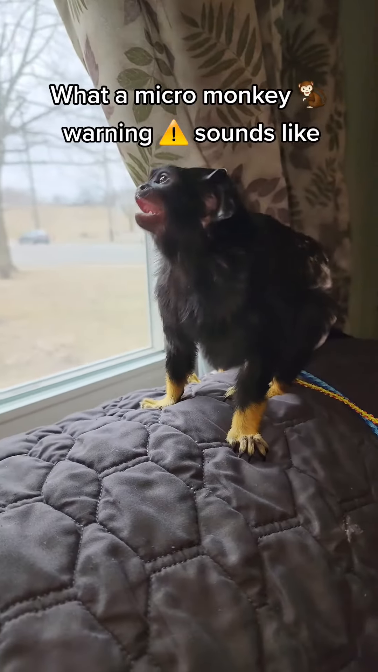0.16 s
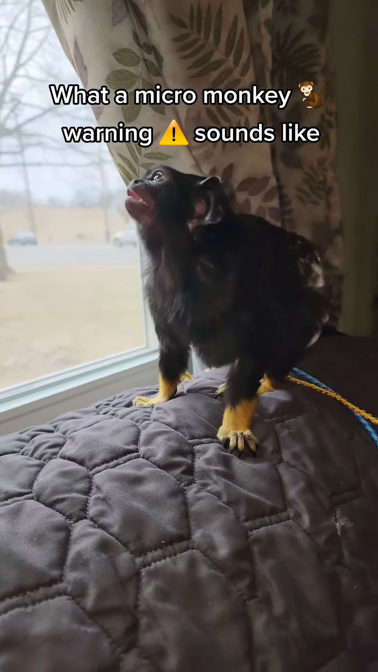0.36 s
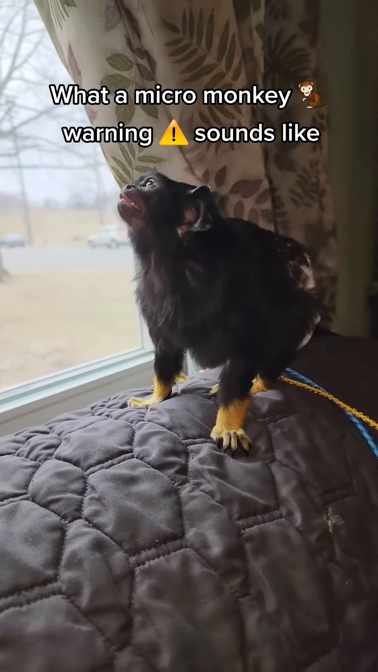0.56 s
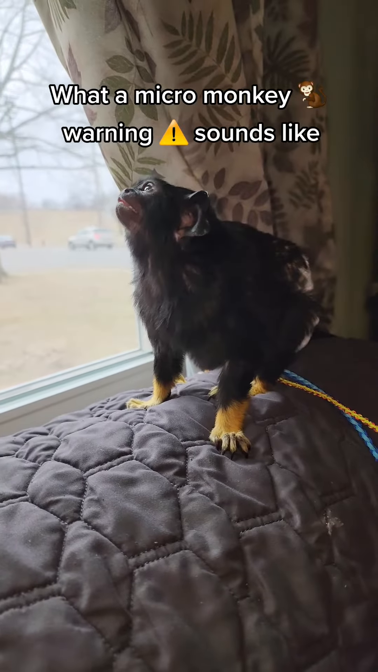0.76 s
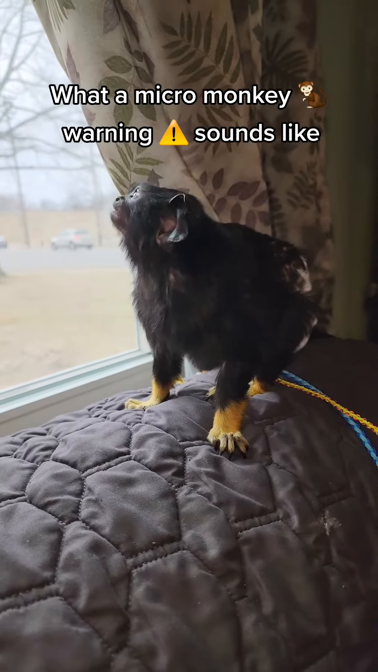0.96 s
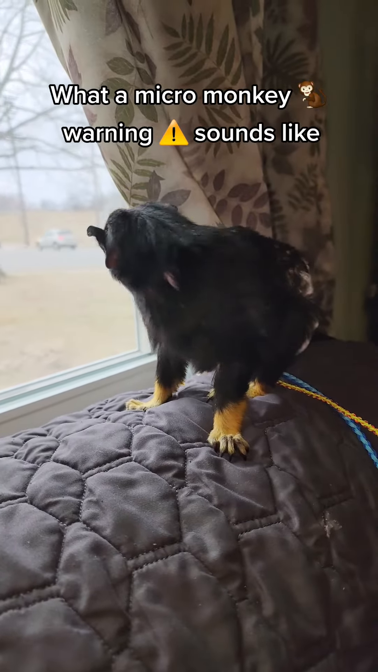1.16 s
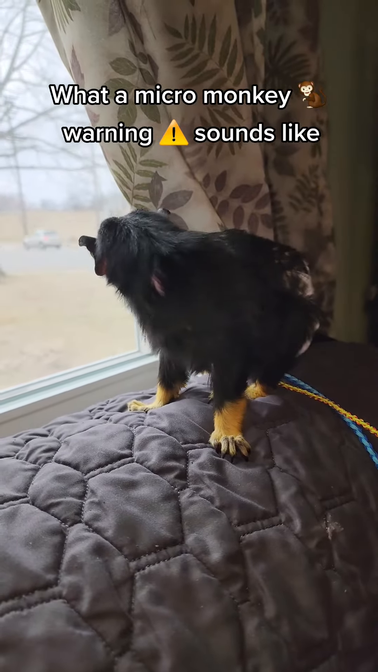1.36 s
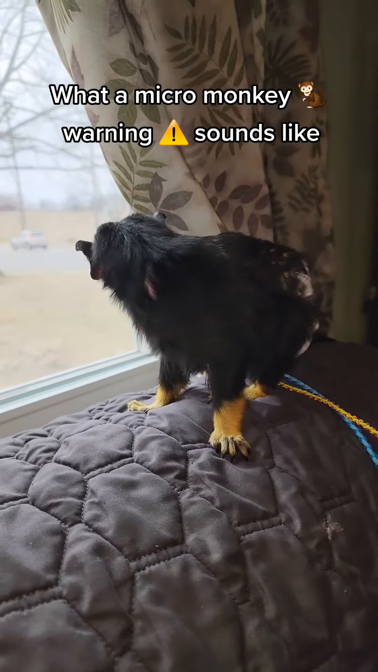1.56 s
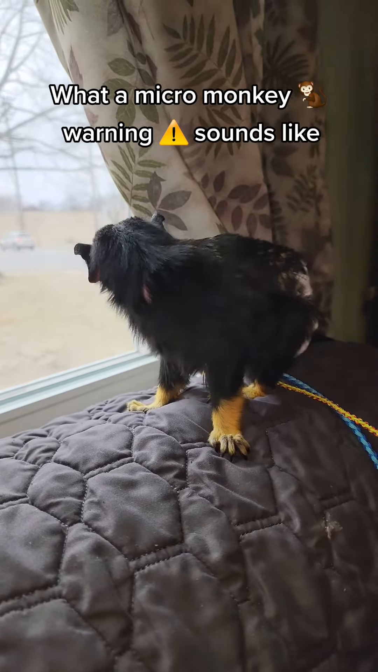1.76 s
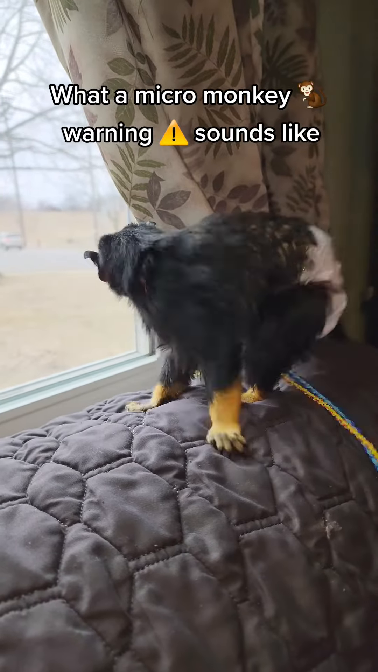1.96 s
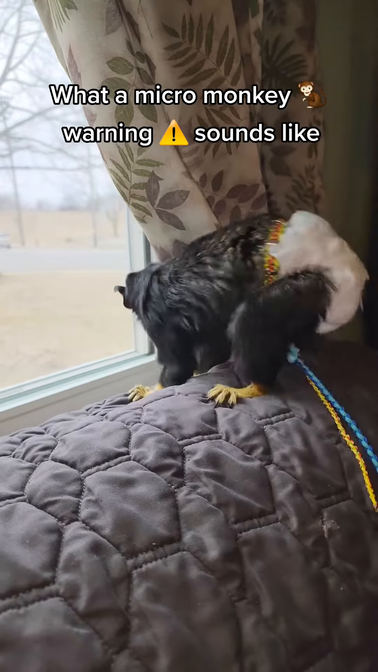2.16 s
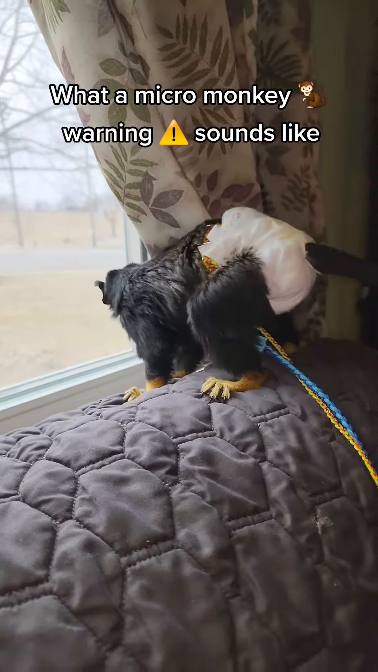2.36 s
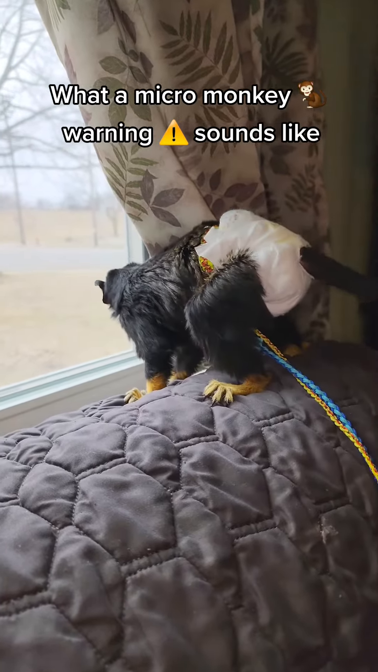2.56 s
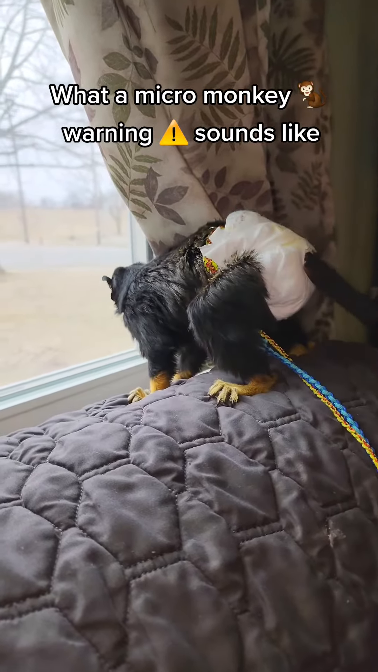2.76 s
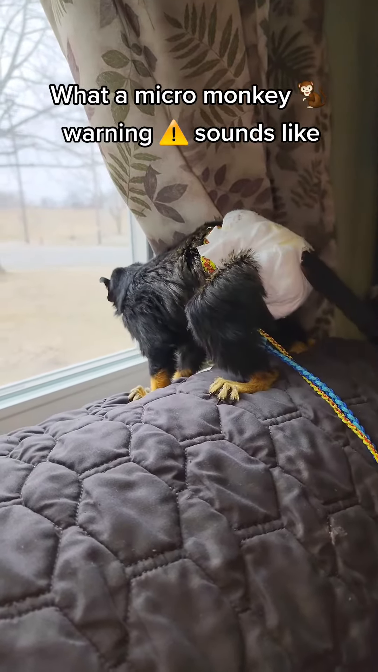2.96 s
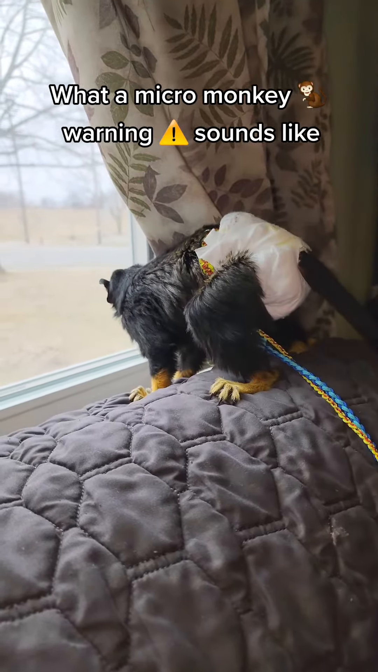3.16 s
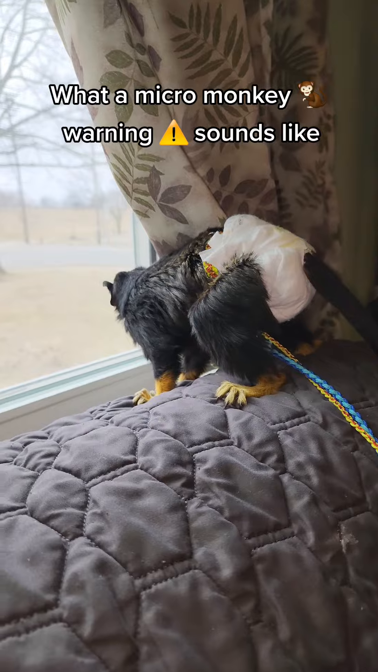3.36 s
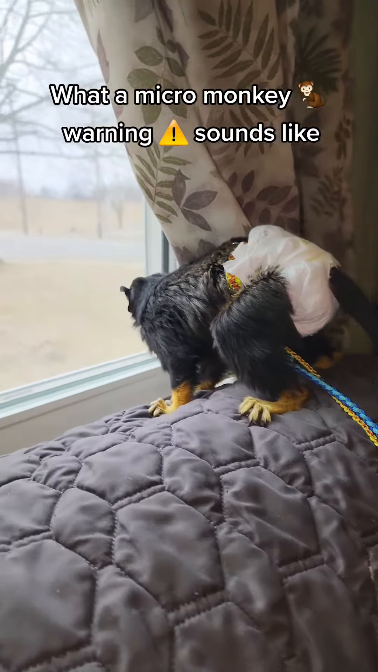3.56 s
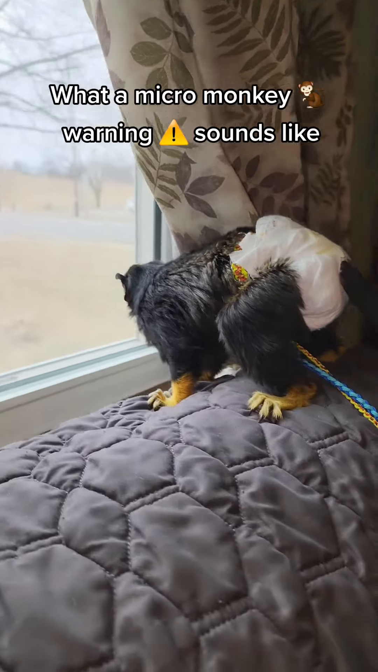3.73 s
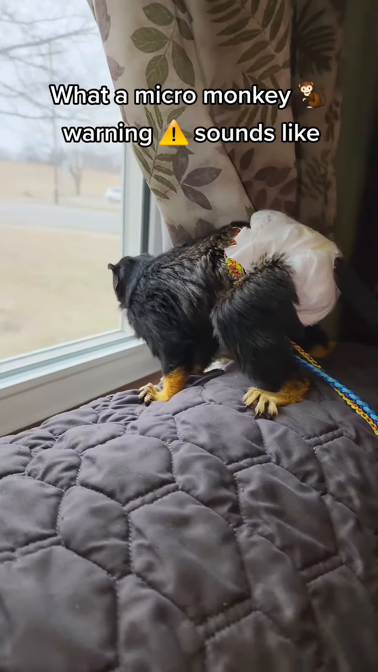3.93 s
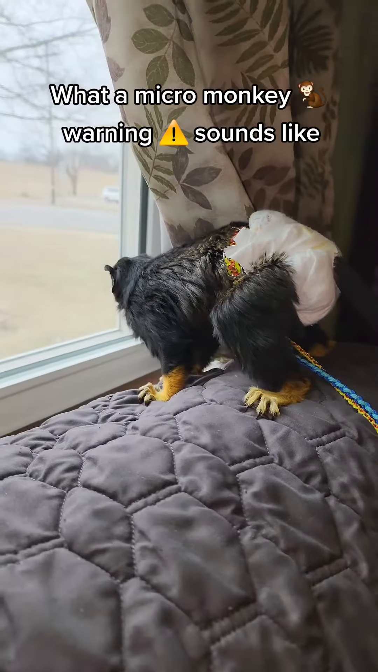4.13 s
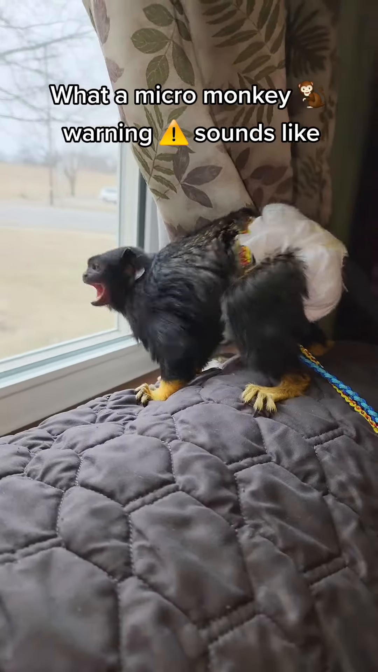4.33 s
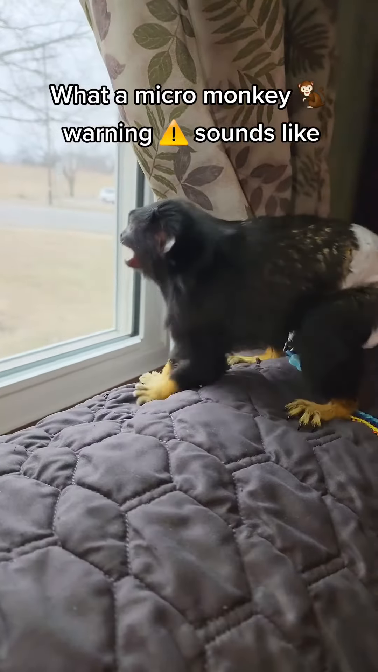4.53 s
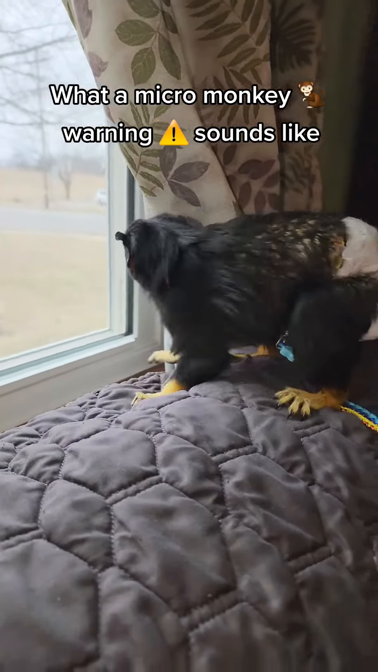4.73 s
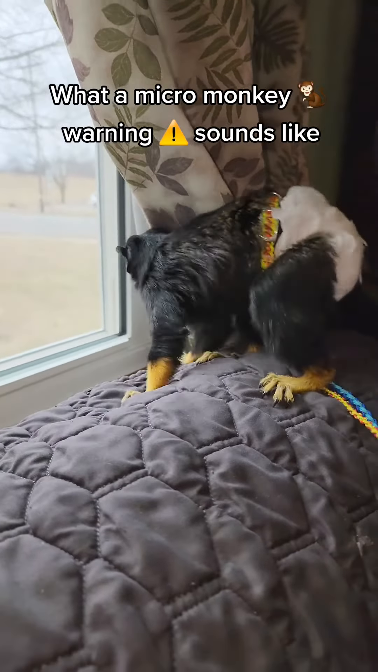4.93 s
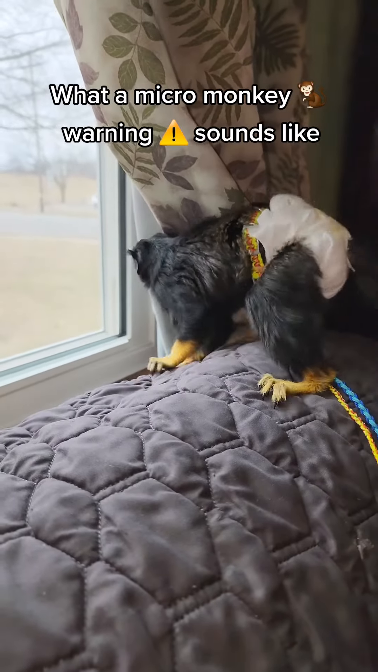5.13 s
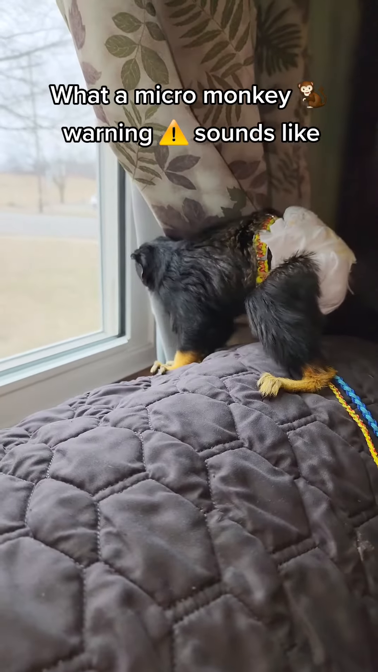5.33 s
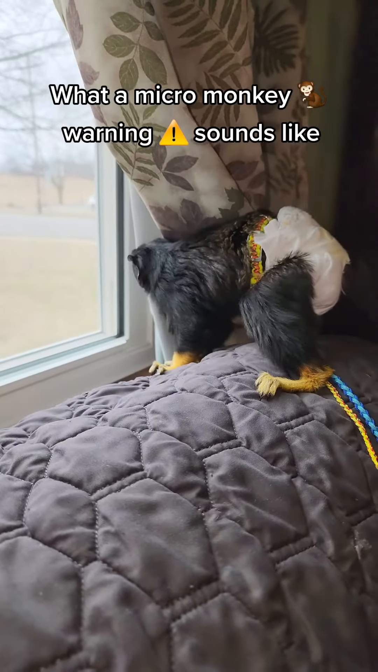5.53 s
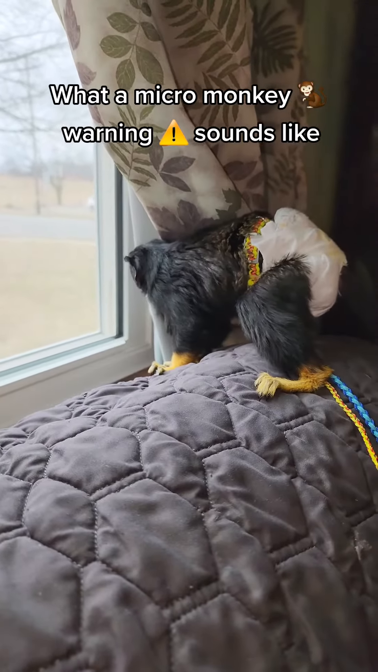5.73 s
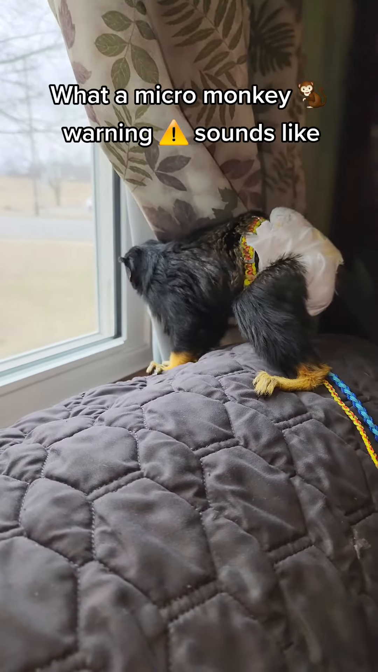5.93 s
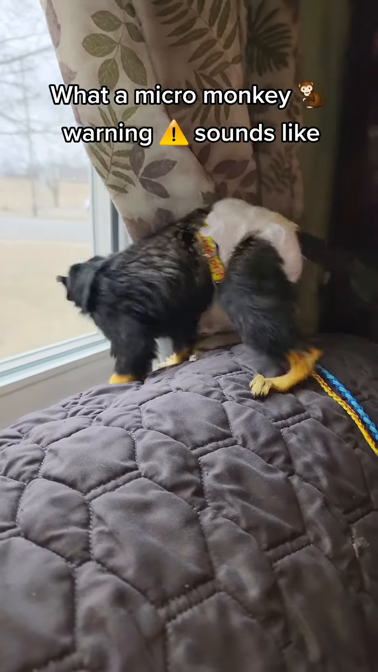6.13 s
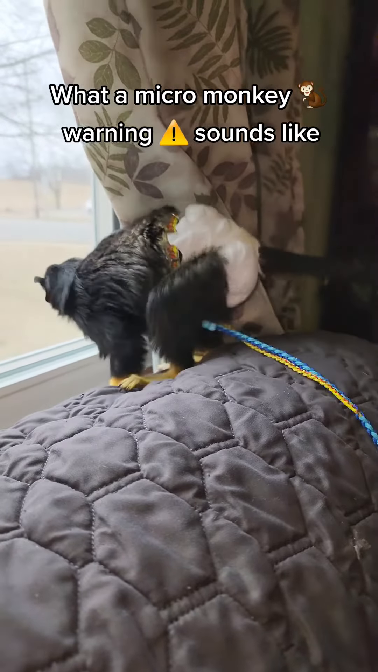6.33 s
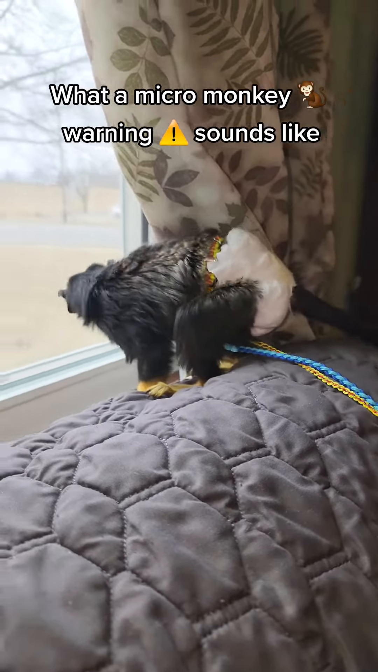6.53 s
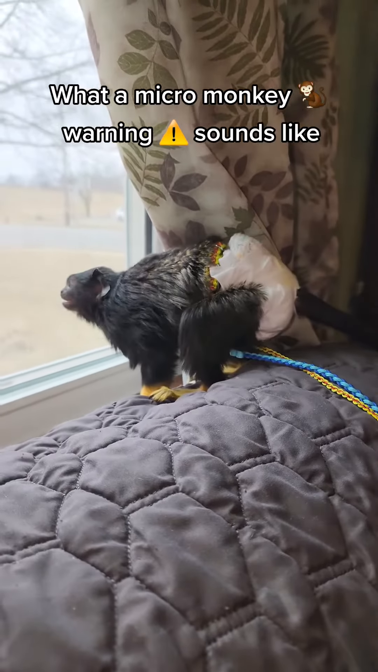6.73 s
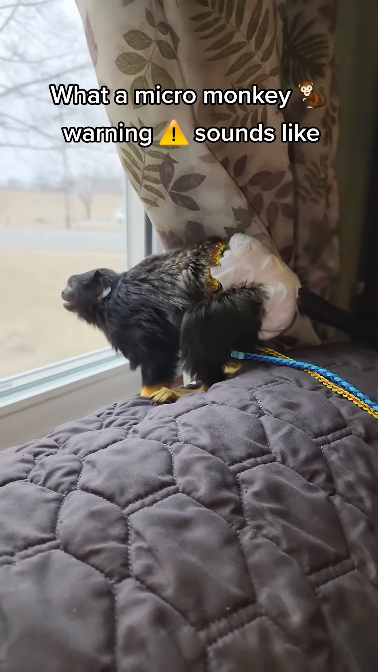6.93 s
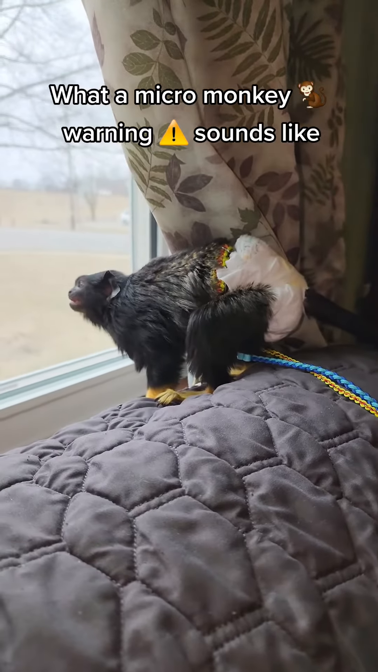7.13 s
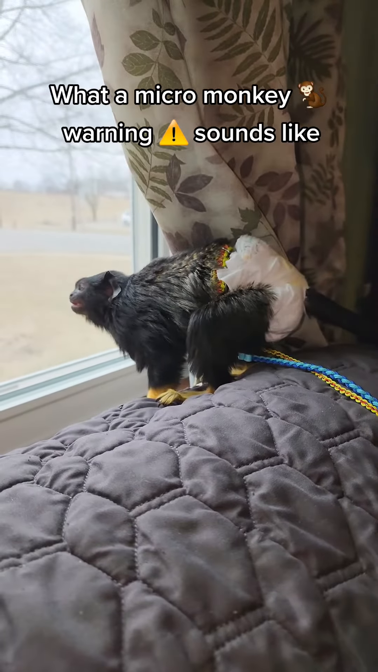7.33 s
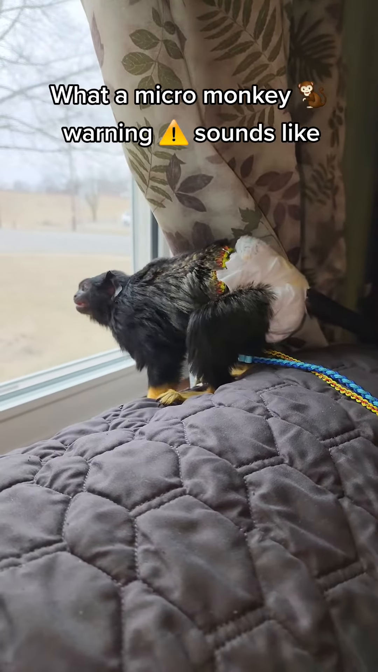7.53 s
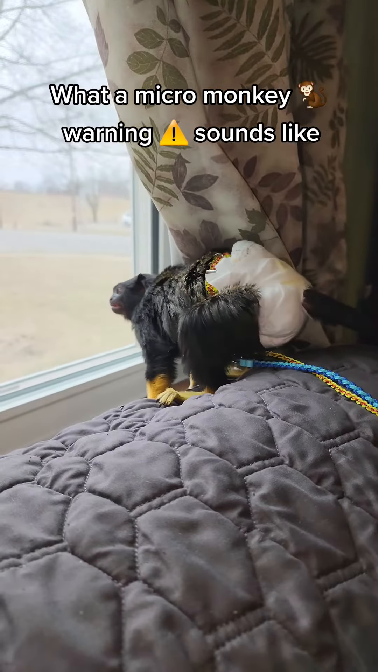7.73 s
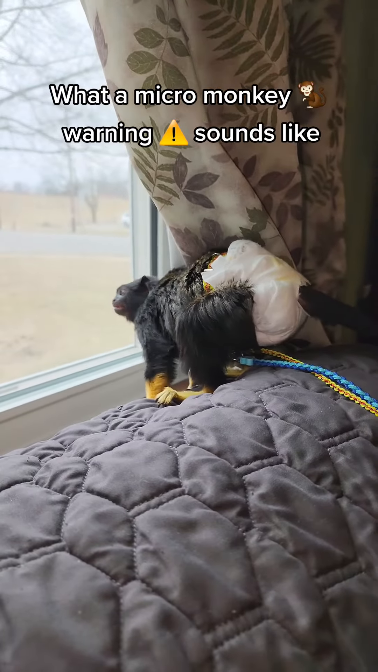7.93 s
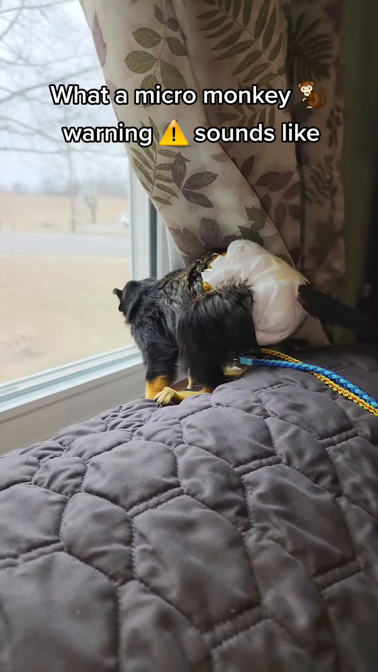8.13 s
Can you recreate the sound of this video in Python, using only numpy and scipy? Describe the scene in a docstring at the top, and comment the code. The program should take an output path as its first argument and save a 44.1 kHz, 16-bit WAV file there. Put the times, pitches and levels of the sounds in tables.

```python
"""On a quilted sofa back by a window, a tamarin gives four bursts of shrill, very short alarm chirps.
Each chirp is a gliding note with partials weighted by the fixed resonances of the mouth.
Between bursts come soft peeps and a thin whistle, also sine tones; shaped noise makes the rustling quilt.
Damped sines make a few dull knocks nearby; a far clock ticks in blurred noise.
The small room rings briefly and hums low; two closely spaced microphones listen."""
import sys
import numpy as np
from scipy import signal
from scipy.fft import rfft, irfft, next_fast_len
from scipy.io import wavfile
from scipy.ndimage import uniform_filter1d, map_coordinates

SR = 44100
rng = np.random.default_rng(int(sys.argv[2]) if len(sys.argv) > 2 else 0)


def master_out(mix):
    """Clip the mix to full scale and print it as 16-bit PCM to the path in sys.argv[1]."""
    frames = np.transpose(np.atleast_2d(mix))
    ceiling = np.clip(frames, -1, 1)
    pcm = np.round(ceiling * 32767).astype(np.int16)
    wavfile.write(sys.argv[1], SR, pcm)


N = 360946  # length in samples
TOP_HZ = 15850  # upper band limit of the notes and the recorder


def amp(db):
    """Decibels to an amplitude factor."""
    return 10 ** (np.asarray(db) / 20)


def unit(x):
    """Scale a signal to rms 1."""
    return x / np.sqrt(np.mean(x ** 2) + 1e-20)


def along(points, hz):
    """Read a curve of (Hz, value) points on a log frequency axis."""
    point_hz, values = np.transpose(points)
    return np.interp(np.log(hz + 1), np.log(point_hz + 1), values)


def over_time(points, s):
    """Read a curve of (s, value) points, holding its end values."""
    return np.interp(s, *np.transpose(points))


def wobble(rate, size):
    """A smooth random curve with rate knots a second."""
    knots = rng.standard_normal(int(size * rate / SR) + 4)
    return map_coordinates(knots, [np.arange(size) * rate / SR])


def filtered(x, response):
    """Apply a response of frequency to a full-length signal."""
    m = next_fast_len(N + SR // 2)
    hz = np.fft.rfftfreq(m, 1 / SR)
    return irfft(rfft(x, m) * response(hz), m)[..., :N]


def add(track, s, sound):
    """Mix a sound into a track at time s."""
    start = max(round(s * SR), 0)
    part = track[..., start:start + sound.shape[-1]]
    part += sound[..., :part.shape[-1]]


def swell(size, crest):
    """A rounded rise and fall that tops at the share crest of its length."""
    skew = np.log(.5) / np.log(np.clip(crest, .15, .7))
    return np.sin(np.pi * np.linspace(0, 1, size) ** skew)


def swells(rows, crest):
    """A gain curve with one fading swell for each (start_s, length_s, level_db)."""
    gain = np.zeros(N)
    for s, length, db in rows:
        add(gain, s, amp(db) * swell(int(length * SR), crest) ** 2)
    return gain


def noise(spectrum):
    """Stereo noise of rms 1: the closely spaced microphones hear nearly the same bass, but different treble."""
    # likeness of the two microphones: pitch_hz [Hz], correlation [0-1]
    likeness = [(60, 0.99), (140, 0.95), (300, 0.67), (700, 0.14), (2000, 0.083), (8000, 0.044)]

    def mid_and_side(hz):
        turn = np.arccos(np.clip(along(likeness, hz), -1, 1)) / 2
        return amp(along(spectrum, hz)) * [np.cos(turn), np.sin(turn)]

    mid, side = filtered(rng.standard_normal((2, N)), mid_and_side)
    return unit(np.array([mid + side, mid - side]))


def patchy(x, depth_db):
    """Noise of rms 1 in which each moment favours other frequencies."""
    z = signal.stft(x, nperseg=256)[2]
    field = rng.standard_normal(z.shape[1:])
    field = uniform_filter1d(field, 4, 0)  # smooth across frequency
    field = uniform_filter1d(field, 7, 1)  # smooth across time
    patches = signal.istft(z * amp(depth_db * unit(field)), nperseg=256)[1]
    return unit(patches[:, :N])


def in_room(sound, pan_db, lag_s, near_db, tail_db, near_s=0.0016, near_t60=0.15):
    """A short sound at both microphones: direct, off the window and near walls, then the room's tail."""
    # decay of the room's tail: pitch_hz [Hz], t60_s [s]
    decay = [(200, 0.24), (1000, 0.093), (4000, 0.3), (8000, 0.265), (14000, 0.061)]
    hz, t, z = signal.stft(rng.standard_normal((2, SR // 2)), SR, nperseg=256)
    fade_db = -60 * t / along(decay, hz)[:, None]
    tail = signal.istft(z * amp(fade_db), SR, nperseg=256)[1]
    t = np.arange(tail.shape[1]) / SR
    sparse = rng.standard_normal(tail.shape) * (rng.random(tail.shape) < .04)
    near = sparse * (t > near_s) * amp(-60 * t / near_t60)
    tail = tail * (t > near_s)
    path = np.zeros(tail.shape)
    for db, part in [(near_db, near), (tail_db, tail)]:
        path += amp(db) * part / np.linalg.norm(part, axis=1, keepdims=True)
    # the direct sound reaches the left side a little later
    path[0] += amp(pan_db / 2) * np.sinc((t - lag_s) * SR)
    path[1, 0] += amp(-pan_db / 2)
    return signal.fftconvolve(sound[None], path, axes=1)


def voice(length, start_hz, end_hz, colour, rough, crest, jitter=0.083, flutter_hz=1300, flutter_db=8, count=5):
    """One gliding note of partials weighted by colour; roughness shakes its pitch and each partial's strength."""
    glide_share = .78  # reaches the end pitch after this share of its length, then holds it
    size = int(length * SR)
    glide = np.interp(np.linspace(0, 1, size), [0, glide_share], [start_hz, end_hz])
    shaken_hz = glide * (1 + jitter * rough * wobble(flutter_hz, size))
    phase = 2 * np.pi * np.cumsum(shaken_hz) / SR
    tone = np.zeros(size)
    for k in range(1, count + 1):
        strength_db = along(colour, k * glide) + flutter_db * rough * wobble(flutter_hz / 2, size)
        tone += amp(strength_db) * (k * glide < TOP_HZ) * np.sin(k * phase)
    return tone * np.sin(np.pi / 2 * swell(size, crest)) ** 2


def chirps(air_db=-39, air_top_hz=9000):
    """Shrill alarm notes with a trace of air; the mouth favours now the octave, now the fundamental."""
    # alarm chirps: start_s [s], length_s [s], start_hz [Hz], end_hz [Hz], level_db [dB], left_right_db [dB]
    calls = [(0.0919, .018, 3625, 4893, -12, 9.5), (.1684, 0.0091, 3940, 3982, -13.5, 10.5),
             (.2335, .0065, 3690, 3664, -23, 11.5), (0.2949, 0.011, 3602, 3800, -12.5, 10.5),
             (2.093, 0.0097, 5500, 5392, -46.5, 3.5), (2.1488, 0.0067, 4250, 5055, -12.5, 4.5),
             (2.2105, 0.019, 3662, 4392, -8, 6), (2.281, 0.0084, 3960, 4039, -30, 17),
             (2.344, 0.0056, 3658, 3603, -18.5, 5.5), (4.507, 0.0033, 5350, 5250, -28, 11),
             (4.6244, 0.014, 3560, 4512, -3.5, 4.5), (4.696, 0.01, 3746, 3853, -12.5, 15.5),
             (4.847, 0.009, 4940, 4980, -59, 6.5), (4.934, 0.013, 5144, 5220, -67, 9.5),
             (5.017, 0.014, 4710, 4624, -76.5, 7.5), (6.276, 0.0047, 4750, 4590, -25.5, 4.5),
             (6.334, .013, 3883, 4395, -11, 8.5), (6.403, 0.0075, 3686, 3710, -13, 10.5)]
    # fixed resonances of the mouth: pitch_hz [Hz], level_db [dB]
    mouth = [(3400, -6.5), (3800, -5), (4300, -3.5), (4700, 4), (5400, -3.5), (6600, -8.5), (7450, -2.5),
             (7900, -6), (8400, -9.5), (9200, -12), (10200, -33), (11300, -26), (12600, -34.5),
             (14000, -49), (15500, -44.5)]
    # weak chirps are hoarse: level_db [dB], roughness [0-1]
    hoarseness = [(-55, 0.7), (-42, 0.4), (-16, 0.12)]
    # the head moves between the microphones: time_s [s], left_lag_s [s]
    head_lag = [(.1, .000085), (.3, 0.000061), (2.1, .000105), (2.35, .00013), (4.6, 0.00013),
                (6.3, 0.00013), (6.4, .000135)]
    low_hz, low_room_db, room_db_per_khz = 3700, -17, 3.5  # higher chirps sound wetter
    walls_db = 9  # near reflections over the tail
    out = np.zeros((2, N))
    airy = signal.butter(2, [1800, air_top_hz], "bandpass", fs=SR, output="sos")
    for s, length, start_hz, end_hz, db, pan_db in calls:
        note = voice(length, start_hz, end_hz, mouth, over_time(hoarseness, db), crest=0.42)
        breath = signal.sosfilt(airy, rng.standard_normal(len(note)))
        air = amp(air_db) * breath * np.hanning(len(note))
        khz_up = ((start_hz + end_hz) / 2 - low_hz) / 1000
        room_db = low_room_db + room_db_per_khz * khz_up
        heard = in_room(amp(db) * (note + air), pan_db, over_time(head_lag, s),
                        near_db=room_db + walls_db, tail_db=room_db)
        add(out, s, heard)
    return out


def peeps():
    """Quiet notes, lower and slightly falling, each with its own balance of overtones."""
    # soft peeps: start_s [s], length_s [s], pitch_hz [Hz], level_db [dB], overtones_db [dB], roughness [0-1]
    calls = [(2.521, 0.033, 2580, -46.5, -3, 0.14), (2.74, 0.029, 2496, -52.5, -12, 0.02),
             (4.48, 0.01, 2000, -63, -4.5, 0.8), (5.229, 0.014, 2785, -61.5, 11.5, .1),
             (5.425, .03, 2335, -50.5, -14.5, 0), (6.134, 0.062, 2063, -73, 6, 0.84)]
    # overtones before each peep's own overtones_db: multiple of the pitch, level_db [dB]
    overtones = [(2, -8.5), (3, 0.5), (4, -16), (5, -22)]
    sag = .03  # share by which the pitch falls
    out = np.zeros((2, N))
    for s, length, hz, db, over_db, rough in calls:
        colour = [(hz, 0)] + [(k * hz, over_db + level) for k, level in overtones]
        note = voice(length, hz, hz * (1 - sag), colour, rough, crest=0.62)
        add(out, s, in_room(amp(db) * note, pan_db=11.5, lag_s=.00006, near_db=-6.5, tail_db=-14))
    return out


def whistle(waver=.008, pan_db=3):
    """One faint, thin sine note that wavers a little in pitch."""
    # course of the whistle before its gain: time_s [s], level_db [dB]
    course = [(3.32, -82), (3.332, -70), (3.352, -95), (3.398, -88), (3.436, -68), (3.476, -86),
              (3.5, -100)]
    pitch_hz, gain_db = 6300, -1
    t = np.arange(N) / SR
    level_db = np.interp(t, *np.transpose(course), left=-np.inf, right=-np.inf)  # silent outside
    phase = 2 * np.pi * np.cumsum(pitch_hz * (1 + waver * wobble(150, N))) / SR
    return amp(gain_db + level_db) * unit(np.sin(phase)) * amp([[pan_db / 2], [-pan_db / 2]])


def knocks(boom_t60=0.06, attack_s=.0012, soft_hz=1650):
    """Soft blows: a quickly damped hollow ring over a low boom that weakens in lighter blows."""
    # dull knocks: start_s [s], level_db [dB, before a common gain], ring_hz [Hz], boom_hz [Hz]
    blows = [(.121, -46.5, 683, 262), (2.436, -44.5, 672, 259), (2.687, -42, 680, 266),
             (2.7547, -30, 744, 266), (2.762, -27, 612, 269), (2.772, -29.5, 700, 236),
             (3.328, -57, 645, 325), (4.201, -41, 650, 287), (4.304, -42, 649, 275.3),
             (8.1309, -23, 648.3, 298), (8.1377, -28.5, 665, 298)]
    # modes of the ring: multiple of the ring pitch, level_db [dB], t60_s [s]
    modes = [(1.001, 7, 0.016), (1.4, -6, 0.012), (2.05, -15, 0.04)]
    gain_db = 4
    heavy_db, heavy_boom_db, boom_grows = -29.5, -5.5, .7  # dB less boom for each dB lighter than heavy
    out, t = np.zeros((2, N)), np.arange(SR // 5) / SR
    padded = signal.butter(4, [150, soft_hz], "bandpass", fs=SR, output="sos")  # a soft contact lacks treble
    for s, db, hz, boom_hz in blows:
        ring = sum(amp(level - 60 * t / t60) * np.sin(2 * np.pi * hz * ratio * t) for ratio, level, t60 in modes)
        boom_db = heavy_boom_db + boom_grows * min(db - heavy_db, 0)
        boom = amp(boom_db - 60 * t / boom_t60) * np.sin(2 * np.pi * boom_hz * t)
        attack = 1 - np.exp(-t / attack_s)
        blow = signal.sosfilt(padded, amp(db + gain_db) * (ring + boom) * attack)
        add(out, s, in_room(blow, 3.28, lag_s=.00007, near_db=-15, tail_db=-11.0))
    return out


def rustles():
    """Cloth rubs, hisses and thuds as the animal shifts: noise under swelling gains."""
    # scuffs of feet and lead on the quilt: start_s [s], length_s [s], rub_db [dB], thud_db [dB]
    scuffs = [(0.045, 0.077, -57, -62.5), (0.099, .26, -62.5, -71.5), (0.344, 0.093, -64, -72.5),
              (2.034, 0.097, -90, -64), (2.245, .24, -57, -60), (2.367, .09, -65, -55),
              (2.598, 0.41, -87.5, -75), (2.76, .11, -65, -47), (3.45, .08, -83.5, -62),
              (3.764, 0.65, -84, -87), (4.491, 0.13, -70, -82), (4.582, 0.061, -54, -86),
              (4.887, .5, -81.5, -88.5), (5.178, 0.17, -67.5, -62.5), (5.271, .26, -72, -63.5),
              (6.145, .06, -67, -88.5), (6.223, 0.12, -64.5, -72), (6.535, .12, -70.5, -87.5),
              (6.662, 0.067, -67.5, -50), (6.671, 0.268, -87, -62), (8.134, 0.13, -53.5, -46.5)]
    # spectrum of the rub: pitch_hz [Hz], relative level_db [dB per Hz]
    rub_spectrum = [(500, -4), (1500, -3), (3000, 1), (5000, 3), (7000, -4), (9000, -13), (15000, -25.5)]
    # spectrum of the fine hiss: pitch_hz [Hz], relative level_db [dB per Hz]
    hiss_spectrum = [(2000, -15.5), (6000, -6), (8500, 4.5), (10500, -8.5), (14000, -2), (15800, -2)]
    # spectrum of the thuds: pitch_hz [Hz], relative level_db [dB per Hz]
    thud_spectrum = [(80, -30), (200, 7), (400, 1.5), (700, -8), (1500, -17), (3000, -24), (8000, -53.5)]
    hiss_db, crest = -3.5, .27  # hiss relative to the rub; where in its length a scuff peaks
    rub = swells([(s, length, db) for s, length, db, _ in scuffs], crest)
    thud = swells([(s, length, db) for s, length, _, db in scuffs], crest)
    grain = unit(amp(3 * wobble(280, N) + 1.2 * wobble(40, N)))  # fibres catch and slip
    hiss = amp(hiss_db) * patchy(noise(hiss_spectrum), depth_db=4.5)
    cloth = patchy(noise(rub_spectrum), depth_db=2) + hiss
    return rub * grain * cloth + thud * noise(thud_spectrum)


def clock():
    """A far clock alternates ticks and weaker tocks, one a second; only their blur in the room arrives."""
    # spectrum of a tick: pitch_hz [Hz], relative level_db [dB per Hz]
    tick_spectrum = [(300, -17), (700, 1.5), (950, 11.5), (1300, -1.5), (2100, -15), (2950, -5.5),
                     (3500, -6), (4100, -7), (5000, -8.5), (6300, -11.5), (9000, -32.5), (15000, -20.5)]
    # spectrum of a tock: pitch_hz [Hz], relative level_db [dB per Hz]
    tock_spectrum = [(300, -21), (900, -1.5), (1600, -5), (2300, -6.5), (3000, 3.5), (4500, 0.5),
                     (5600, 1.5), (7000, -6), (9000, -17.5), (15000, -25)]
    first_s, every_s, length_s = .207, 1, 0.076
    tick_db, tock_db = -62, -68
    beats = [(s, length_s, 0) for s in np.arange(first_s, N / SR, every_s)]
    tocks = swells(beats[0::2], crest=0.25)
    ticks = swells(beats[1::2], crest=0.25)
    tick = amp(tick_db) * ticks * patchy(noise(tick_spectrum), depth_db=3.5)
    tock = amp(tock_db) * tocks * patchy(noise(tock_spectrum), depth_db=3.5)
    return tick + tock


def room_tone(noise_db=-1, drift=0.99):
    """A low rumble of shaped noise with a few faint hum lines that waver in phase."""
    # spectrum of the room: pitch_hz [Hz], relative level_db [dB per Hz]
    floor = [(12, -28), (20, -8), (42, -3.5), (61, -3), (172, -14.5), (221, -24), (284, -20), (317, -29.5),
             (408, -32.5), (603, -34), (693, -32.5), (1180, -39.5), (1350, -40), (2240, -48.5),
             (15800, -70.5)]
    # course of the room noise before noise_db: time_s [s], level_db [dB]
    course = [(0, -48), (2.35, -52.5), (2.55, -55), (6.7, -52.5), (8.1, -52.5)]
    # hum lines, before they follow the rumble: pitch_hz [Hz], level_db [dB]
    hum_lines = [(42.5, -65), (66, -63), (122, -66.5), (287, -76.5), (690, -87.5)]
    t = np.arange(N) / SR
    rumble = amp(noise_db + over_time(course, t))
    steady = amp(noise_db + np.mean(np.transpose(course)[1]))
    air = noise(floor)
    bass = filtered(air, lambda hz: 1 / (1 + (hz / 220) ** 4))  # of the noise, only the bass changes level
    hum = sum(amp(db) * unit(np.sin(2 * np.pi * hz * t + drift * wobble(8, N))) for hz, db in hum_lines)
    return rumble * bass + steady * (air - bass) + hum * rumble / steady


def scene():
    """The animal, the small sounds around it and the room."""
    return chirps() + peeps() + whistle() + knocks() + rustles() + clock() + room_tone()


def record(dry, hardness=12):
    """The recorder rounds off the loudest peaks and keeps nothing above its band limit."""
    clip_top = 1.0  # full scale
    rounded = dry / (1 + np.abs(dry / clip_top) ** hardness) ** (1 / hardness)
    return filtered(rounded, lambda hz: hz < TOP_HZ)


dry = scene()
out = record(dry)
master_out(out)
```